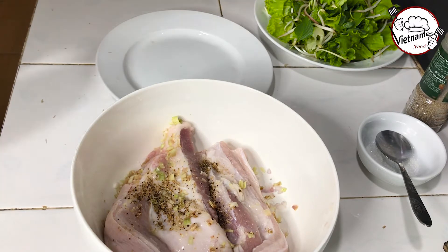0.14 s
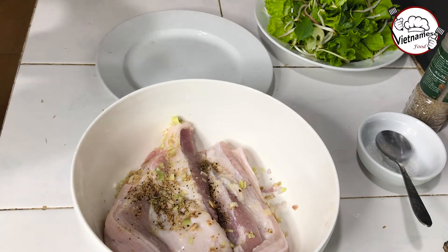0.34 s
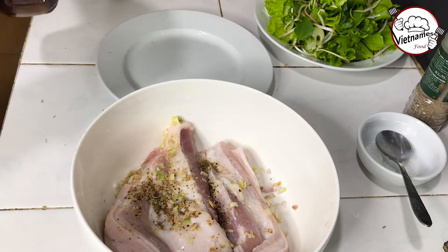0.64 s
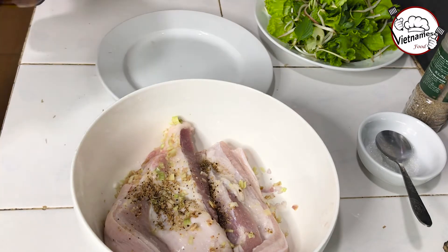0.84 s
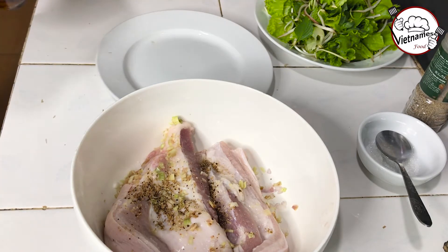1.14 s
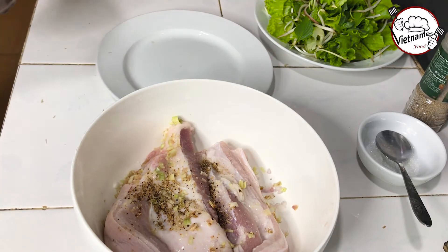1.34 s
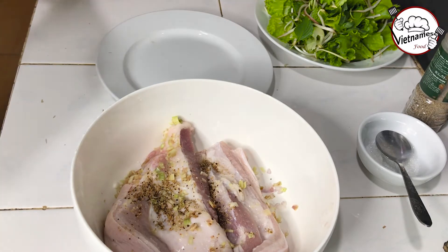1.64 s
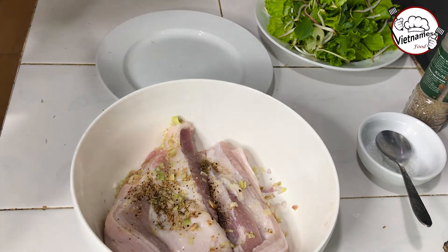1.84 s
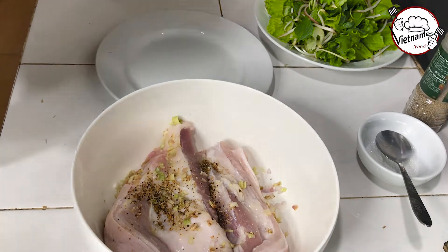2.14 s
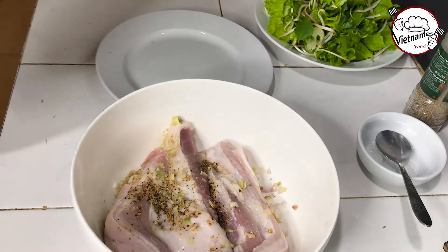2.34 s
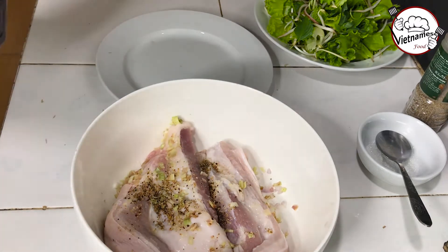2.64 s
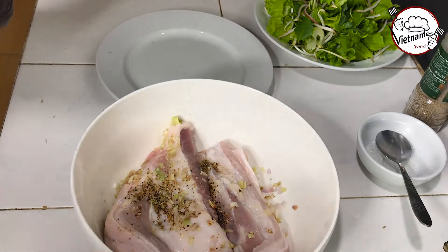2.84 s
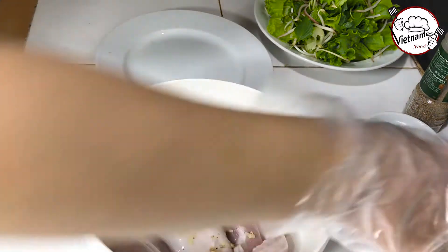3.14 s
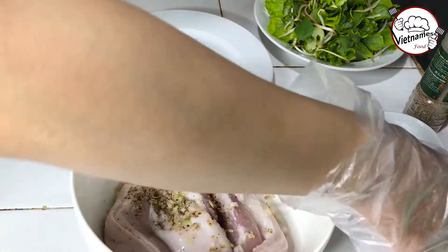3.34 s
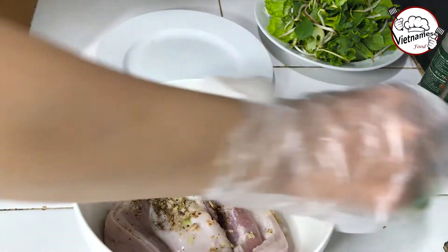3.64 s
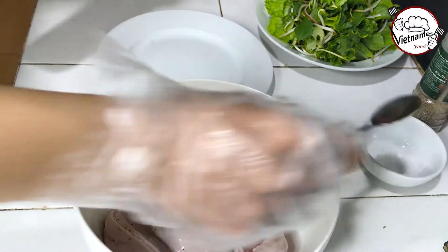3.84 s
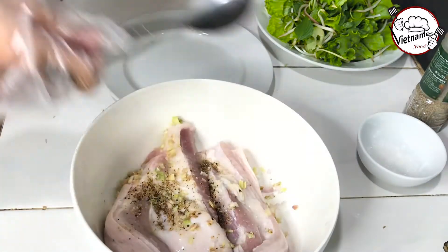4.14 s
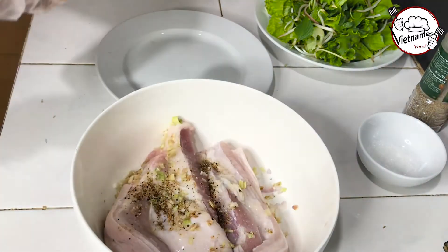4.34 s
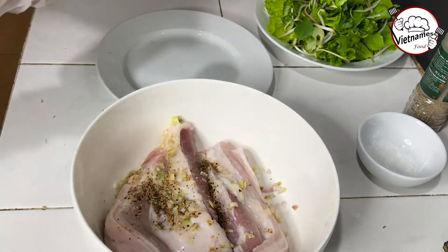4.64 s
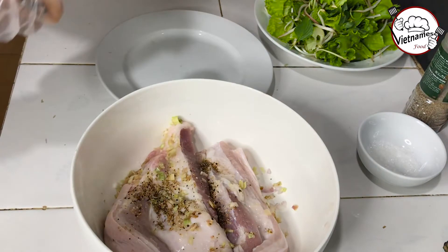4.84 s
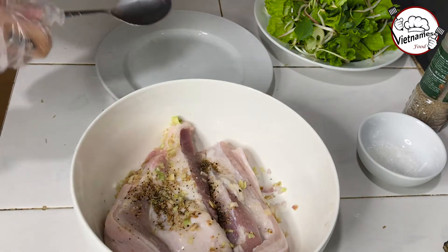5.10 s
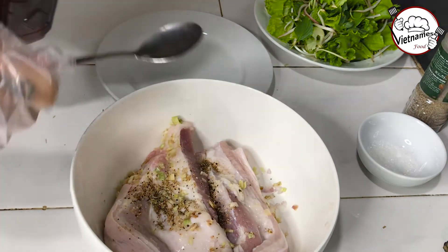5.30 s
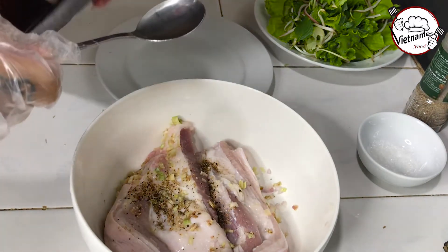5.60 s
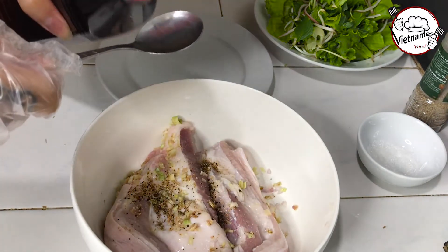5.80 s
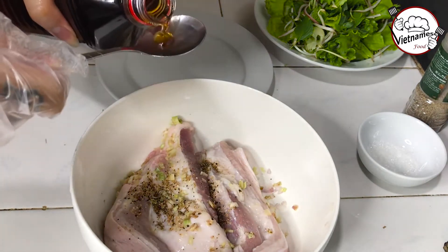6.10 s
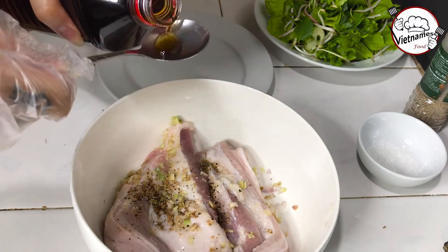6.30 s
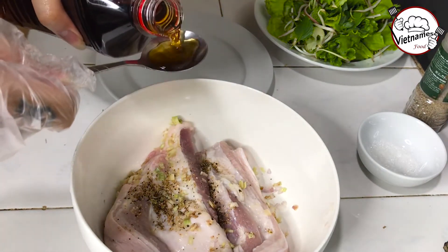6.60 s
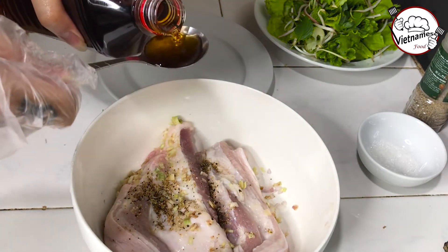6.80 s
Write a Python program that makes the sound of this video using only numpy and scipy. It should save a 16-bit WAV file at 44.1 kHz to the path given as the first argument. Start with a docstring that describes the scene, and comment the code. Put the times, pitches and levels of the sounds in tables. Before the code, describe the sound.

Thin plastic gloves rustle and crinkle close to the microphone over a tiled kitchen counter. A cap clicks open in two quick steps and a bottle knocks sharply on the tiles. A brief rush of noise swells as a spoon clinks and scrapes faintly on a small ceramic dish. The gloves crinkle again, louder for a moment, then sauce glugs quietly from the bottle over a faint low room rumble.

```python
"""Thin plastic gloves rustle and crinkle, close to a small microphone over a tiled kitchen counter:
the film buckles in countless tiny ticks and its sharper creases snap. Just as near, a cap clicks open,
a bottle knocks on the tiles, a spoon clinks and scrapes on a small dish, and sauce glugs as air enters
the bottle neck. Behind it all the kitchen rumbles and a far engine drones briefly.
A broad rush of noise starts abruptly at 2.45 s and dies away by 3.3 s."""
import sys
import numpy as np
from scipy import signal
from scipy.fft import rfft, irfft
from scipy.io import wavfile
from scipy.ndimage import uniform_filter1d

SR = 44100
rng = np.random.default_rng(int(sys.argv[2]) if len(sys.argv) > 2 else 0)


def to_wav(s):
    """Save 16-bit WAV."""
    ch = np.atleast_2d(s).T  # columns
    pcm = np.round(np.clip(ch, -1, 1) * 32767)  # PCM
    wavfile.write(sys.argv[1], SR, pcm.astype(np.int16))


N = 306933

# Centres of the five glove bands: f/Hz
GLOVE_BANDS = [1400, 2650, 4600, 7700, 12600]
# Offset of each band from the 6-10 kHz level: level/dB
GLOVE_BALANCE = [-18.5, -11, -5.5, -1.3, 0]
# Glove rustle, with a smooth, loud hiss from 2.45 to 3.25 s:
# t/s, level at 6-10 kHz/dB, extra body/dB per octave below, extra top/dB, patchiness/0-1
RUSTLE_AND_HISS = [(0, -69, 5, 15, 0.6), (.25, -71.5, 1, 3, 0.81), (.8, -60.5, -0.5, -6.5, 1),
                   (1.3, -68.5, 3.5, 4.5, 0.76), (2.2, -66, 3.5, -0.5, 0.71), (2.44, -45.5, -4, -9, 0.38),
                   (2.46, -44.5, 4, 1, 0.18), (3.24, -45, 3, 4, 0), (3.4, -71.5, -9, 7, 1),
                   (3.55, -53.5, -20, 7.5, 0.96), (3.95, -59, -0.5, 7, 1), (3.98, -70, 0, 6, 1),
                   (4.0, -61.5, -3, 11, 0.8), (4.07, -54.5, 0.5, 5, 0.93), (4.5, -51, 0, -1.5, 1),
                   (4.72, -61, 0.5, -1.5, 1), (4.88, -72.5, 3, 6.5, 1), (5.24, -71.5, 2.5, 9, 0.8),
                   (5.29, -50.5, 3, 2, 0.44), (5.48, -31.5, 0.5, 1.5, 0.41), (5.68, -46.5, -1.5, -4.5, .6),
                   (5.99, -60, 3.5, 0.5, 1), (6.08, -77.5, 3, 2, 0.95), (6.96, -93.5, 2, 1, 1)]
# Single crumples: t at full level/s, rise/s, hold/s, level at 6-10 kHz/dB,
# extra body/dB per octave below, extra top/dB, ring f/Hz, ring offset/dB
CRUMPLES = [(.055, .02, 0.022, -71, 0, 14, 13500, -4), (.15, .03, 0.046, -77, 6, 5, 13500, -2),
            (0.284, 0.025, .01, -46.5, 2, 2, 2117, -13), (0.363, .05, 0.031, -50.5, -2.5, -1, 5100, -10.5),
            (0.478, 0.046, .01, -63.5, -4, 3, 6470, -8), (0.581, 0.067, .02, -48, -1.5, -1.5, 3670, -8),
            (.68, 0.036, 0.011, -61.5, -1, -6, 3640, -7), (0.748, 0.023, .04, -58, 0, -2, 3700, -2.5),
            (0.831, 0.062, 0.038, -44.5, -2, -3.5, 3700, -10), (0.932, .04, 0.04, -52, -0.5, 2, 6700, -8),
            (0.984, .04, 0.022, -51, 0, -1, 9300, 0), (1.125, .02, 0.13, -57.5, -3, 2, 9300, 0),
            (1.44, .06, 0.023, -49.5, -1.5, 9.5, 1790, -16),
            (1.631, 0.058, 0.015, -43.5, -0.5, 3, 4970, -9.5),
            (1.913, 0.055, .05, -61, -0.5, 4, 4700, -5.5), (2.03, 0.043, 0.0076, -52, -1.5, -4, 4500, -5.5),
            (2.314, 0.073, 0.024, -43, -2, -2, 7800, -7.5), (2.401, .02, 0.026, -41, -3, -9, 2800, -14),
            (2.465, 0.03, 0.053, -36, 2.5, 1.5, 6200, -11.5), (2.577, .04, 0.024, -37, 2, -2.5, 7000, -12),
            (2.757, .04, 0.072, -48.5, 4.5, 7, 7000, -11), (3.087, .02, 0.032, -41.5, 3, 2.5, 12500, -8),
            (3.175, 0.034, 0.055, -35.5, 0.5, 2, 9600, -15), (3.304, .03, 0.03, -49, -2.5, 0, 5400, -10),
            (3.545, 0.026, 0.056, -47, 1, 0, 2490, -5), (3.615, 0.018, 0.022, -53.5, -0.5, -3, 1000, -16),
            (3.769, .01, 0.011, -43.5, 1.5, 2, 4430, -7), (3.84, 0.033, 0.045, -56, 1.5, 5, 8600, -2),
            (4.082, .02, 0.055, -58.5, -2, 2, 2600, -4.5), (4.174, .01, 0.016, -46, -0.5, -1, 4500, -6.5),
            (4.346, .02, 0.09, -46.5, -1.5, 1, 2600, -12.5), (4.44, .04, 0.038, -45.5, 0, -1, 2595, -12.5),
            (4.667, .03, 0.039, -51, 4, 2, 2580, -5), (4.965, 0.055, 0.008, -53, -2.5, -4.5, 4590, -7.5),
            (5.067, .01, 0.024, -56.5, 2.5, 2.5, 9400, -3), (5.275, .02, .03, -56, -2, 1, 2500, -4.5),
            (5.366, .04, 0.034, -39.5, -7, 3, 6500, -9), (5.65, .02, .01, -46, -7, 2, 2880, -11),
            (5.814, .03, 0.022, -52, 1, 0, 2480, -11), (6.116, 0.011, .02, -70, 1.5, 8.5, 3740, -1.5),
            (6.232, .02, 0.044, -78.5, 1.5, 0.5, 13000, 1), (6.449, .03, 0.015, -75, 0.5, -0.5, 3490, -5),
            (6.587, 0.043, .02, -80, 2.5, 5, 11450, -2), (6.666, .01, .01, -79, -2, 7, 11300, 0),
            (6.917, .04, 0.016, -70, -6.5, 7.5, 4400, -5)]
def band_levels():
    """Close glove rustle, the spell of smooth hiss and the crumples, summed as dB per Hz in each band."""
    t = np.arange(0, N, 64) / SR
    octaves_below = np.maximum(np.log2(GLOVE_BANDS[3] / np.array(GLOVE_BANDS)), 0)[:, None]
    is_top = (np.arange(5) == 4)[:, None]
    widths_hz = np.array([1000, 1500, 2500, 4000, 5800])
    db, body, top_db, _ = curves(RUSTLE_AND_HISS)[:, ::64]
    power = undb(2 * (db + body * octaves_below + top_db * is_top))
    for s, rise, hold, db, body, top_db, _, _ in CRUMPLES:
        power += undb(2 * (db + crumple_db(t, s, rise, hold) + body * octaves_below + top_db * is_top))
    density = 10 * np.log10(power / widths_hz[:, None]) + np.array(GLOVE_BALANCE)[:, None]
    return np.array([np.interp(np.arange(N) / SR, t, row) for row in density])


def crumple_db(t, s, rise, hold, rise_db=25.5, release_db_per_s=350):
    """One crumple rises, holds and dies away, in dB relative to its full level."""
    return -rise_db * np.maximum(s - t, 0) / rise - release_db_per_s * np.maximum(t - s - hold, 0)


def patch_rings(film):
    """Each crumpled patch of film rings in a narrow band of its own."""
    out = np.zeros(N)
    for s, rise, hold, db, _, _, hz, ring_db in CRUMPLES:
        i = np.arange(max(int((s - .15) * SR), 0), min(int((s + .35) * SR), N))
        envelope = undb(db + ring_db + crumple_db(i / SR, s, rise, hold))
        out[i] += envelope * unit(band(film[i], hz, 0.065 * hz))
    return out


# Bands the stretched film favours with hands empty, on the spoon, on the bottle:
# from t/s, [(f/Hz, width/Hz, level/dB)]
GRIPS = [(0, [(2010, 50, -2), (3550, 68, -3.5), (4900, 150, -6), (6460, 240, 1), (8480, 170, -12),
         (9200, 400, 3), (10570, 290, -0.5), (12100, 250, -7.5), (13300, 490, 5.5), (14800, 76, -18.5)]),
         (2.45, [(2600, 46, -5.5), (4510, 290, -0.5), (5280, 270, -9.5), (6350, 160, -4), (8500, 330, 1.5),
         (9850, 240, -9.5), (10940, 220, -3.5), (11300, 51, -16.5), (13000, 230, -10), (14600, 150, 6),
         (15270, 200, 1)]), (5.2, [(2830, 80, -4), (3550, 80, -3.5), (4500, 240, -1), (5700, 260, -3),
         (6470, 240, 2.5), (8800, 130, -2), (9400, 360, -13), (12200, 82, -7.5), (14000, 200, -2),
         (14700, 340, 2)])]
# How much of the rustle breaks into separate crinkles: t/s, share/0-1
SEPARATION = [(0, 0.47), (2.4, 0.4), (3.3, 0.57), (4.7, 0.47), (5.3, .4), (5.62, 0.3), (5.8, 0.88),
              (6.96, 1)]
def glove_rustle_and_hiss(density, swish=0.84, patchy_db=9.5, flicker_db=1.94, grip_depth=0.69):
    """Close up, tiny buckles ride on a smooth swish; patches of film come and go in narrow bands."""
    patchiness = curves(RUSTLE_AND_HISS)[-1]
    apart = curves(SEPARATION)[0]
    dense = unit(swish + grains(per_s=880, spread_db=3.5, most_db=23, grain_s=0.00062))
    sparse = unit(0.6 + grains(per_s=110, spread_db=12, most_db=6.6, grain_s=0.0029))
    film = (np.sqrt(1 - apart) * dense + np.sqrt(apart) * sparse) / 1.475 * rng.standard_normal(N)
    grip = np.searchsorted([s for s, _ in GRIPS[1:]], np.arange(N) / SR)
    flicker = flicker_db * walk(40)
    out = np.zeros(N)
    for hz in np.arange(1000, 16000, 340):
        place = np.interp(np.log(hz), np.log(GLOVE_BANDS), np.arange(5))
        k = min(int(place), 3)
        db = density[k] + (place - k) * (density[k + 1] - density[k])
        db -= 8 * max(np.log2(GLOVE_BANDS[0] / hz), 0)  # 8 dB per octave under the lowest band
        peak_db = [max(top - 6 * ((hz - f) / max(width, 300)) ** 2 for f, width, top in peaks)
                   for _, peaks in GRIPS]
        grip_db = np.maximum(peak_db, -12) + 8
        patch_db = grip_depth * grip_db[grip] + patchy_db * np.tanh(1.5 * walk(7))
        out += undb(db + patchiness * patch_db + flicker) * band(film, hz, 226.7)
    return out * np.sqrt(SR / 2) * undb(-1.5) + patch_rings(film)


# The clearest creases snapping at the microphone: t/s, peak level/dB, f/Hz
CREASES = [(0.2747, -31, 12800), (0.5816, -40, 9610), (1.0826, -34, 3770), (1.178, -39, 10500),
           (1.4351, -34, 9600), (1.633, -31, 7950), (2.2144, -49, 12200), (2.2419, -44.5, 4460),
           (2.3201, -27.5, 7940), (2.3476, -30, 7480), (2.397, -31, 7760), (2.7985, -30, 11700),
           (2.8241, -26.5, 7120), (2.8977, -30, 9000), (2.9523, -27.5, 7420), (3.052, -37, 7190),
           (3.0906, -24, 12800), (3.162, -31, 12400), (3.2005, -27, 12800), (3.7184, -32, 9600),
           (3.7728, -32.5, 4370), (3.9921, -33, 12000), (4.0526, -41, 8500), (4.1714, -29, 10700),
           (4.217, -33, 11200), (4.4613, -25.5, 5350), (5.0707, -28.5, 9600), (5.103, -34.5, 10100),
           (5.2382, -42.5, 12000), (5.2703, -37, 8600), (5.338, -33.5, 11400), (5.3598, -30.5, 6500),
           (5.4642, -24, 11200), (5.5142, -27.5, 11800), (5.657, -34, 5900), (5.8197, -35, 8900),
           (6.126, -50, 12600), (6.2133, -45, 7240), (6.2377, -49, 13000), (6.4182, -49.5, 12040),
           (6.6333, -46, 8970), (6.7685, -49.5, 4760), (6.917, -54.5, 4410)]
def crease_snaps(density, small_count=60, spread_db=2.5, edge_db=-10.5):
    """A crease gives a tick that rings for a few cycles, with a bright edge; small ones come at random."""
    out = np.zeros(N)
    when, size, pitch = rng.random((small_count, 3)).T
    local_db = density[3, (when * N).astype(int)] + 10 * np.log10(4000)  # level at 6-10 kHz
    small_db = local_db + 2 - spread_db * np.log(1 - size)
    small = zip(when * N / SR, small_db, 4000 * 3 ** pitch)
    for s, db, hz in [*CREASES, *small]:
        tick = crack(0.013)[:2048]
        body = band(tick, hz, 0.37 * hz)
        edge = band(tick, 12500, 6000)
        add(out, s, undb(db) * (body / np.abs(body).max() + undb(edge_db) * edge / np.abs(edge).max()))
    return out


# The cap giving way, close by: t/s, level/dB, ring offset/dB, crack offset/dB, rattle offset/dB
CAP_CLICKS = [(1.736, -12.5, -2.5, -26, -33), (1.815, -21.5, 11, -33, -1)]
# Modes of the cap: f/Hz, level/dB, t60/s
CAP_MODES = [(1196, 1.5, .04), (2550, -12, 0.023), (4730, -1, 0.033), (5480, 9.5, 0.0058),
             (6900, -23, 0.011), (10400, 8, 0.0045), (13500, -2, 0.017)]
def cap_clicks():
    """The cap clicks open in two quick, bright steps."""
    return impacts(CAP_CLICKS, CAP_MODES)


# Bottle meeting counter: t/s, level/dB, ring offset/dB, crack offset/dB, rattle offset/dB
BOTTLE_KNOCKS = [(1.98, -42.5, 12.5, -1.1, -16), (2.094, -4, -5.5, -0.6, -19),
                 (2.105, -4.5, -2.5, -0.61, -25)]
# Modes of the bottle: f/Hz, level/dB, t60/s
BOTTLE_MODES = [(1050, -3, 0.037), (1572, -12, .08), (1684, -5.5, 0.18), (1762, 5, 0.065), (3220, -19, .03),
                (3700, -7, 0.015), (6350, -4.5, 0.0099), (7700, -9, 0.0046), (10200, -14, .01)]
def bottle_knocks():
    """The bottle knocks on the tiles near the microphone and rings briefly."""
    return impacts(BOTTLE_KNOCKS, BOTTLE_MODES)


def impacts(hits, modes, rattle_t60_s=0.13):
    """Each hard contact gives a ring, a crack and a short rattle, with the lows rolled off."""
    out = np.zeros(N)
    for s, db, ring_db, crack_db, rattle_db in hits:
        add(out, s, undb(db + ring_db) * ring(modes, length_s=.4))
        add(out, s, undb(db + crack_db) * band(crack(0.0038), 3900, 9500))
        add(out, s, undb(db + rattle_db) * band(crack(rattle_t60_s), 4500, 9400))
    return band(out, 9390, 13530)


# Spoon striking the dish on the counter: t/s, peak level/dB
SPOON_CLINKS = [(2.596, -11), (2.6042, -21.5)]
# The dish's tight cluster of modes: f/Hz, level/dB, t60/s
DISH_MODES = [(3000, -21, .05), (3245, -39, .06), (3488, -15.5, 0.065), (3760, -5, .07), (3830, -11, .05),
              (3870, -3.5, .08), (4054, 9.5, .08), (3630, -2.5, 0.15), (4083, 11, 0.12), (4164, 6.5, .2),
              (4320, 0, .12), (4500, -15.5, .12), (4410, -10, .09), (4619, -10, 0.068)]
def spoon_on_dish(shiver_db=-42.5, hold_s=0.073, fall_db_per_s=107, scrape_db=-54, scrape_s=(3.28, 3.8)):
    """Steel on ceramic, close by: the spoon clinks, shivers, then scrapes round the dish."""
    out = np.zeros(N)
    for s, db in SPOON_CLINKS:
        add(out, s, undb(db) * ring(DISH_MODES, length_s=.6))
        add(out, s, undb(db - 18.5) * band(crack(.004), 4000, 6500))
    friction = (0.32 + grains(per_s=300, spread_db=3, most_db=14, grain_s=.003)) * rng.standard_normal(N)
    dish_colour = ring(DISH_MODES, length_s=.0015, scatter_db=0.906, rough=0)
    rubbing = unit(signal.fftconvolve(friction, dish_colour)[:N])
    t = np.arange(N) / SR
    since = t - SPOON_CLINKS[0][0]
    shiver = (since > 0) * undb(shiver_db - fall_db_per_s * np.maximum(since - hold_s, 0))
    inside_s = np.minimum(t - scrape_s[0], scrape_s[1] - t)
    scrape = undb(scrape_db) * np.clip(inside_s / .07 + 1, 0, 1) ** 2  # 70 ms fades
    return out + (shiver + scrape) * rubbing


def bottle_squeeze(at_s=5.475, db=-46.5):
    """The hand closes round the bottle with a dull bump that dies slower than it came."""
    t = np.arange(N) / SR - at_s
    swell = np.exp(np.where(t < 0, t / 0.0078, -t / 0.016))
    dull_noise = unit(band(band(rng.standard_normal(N), 1040, 1080), 1100, 1150))
    return undb(db) * swell * dull_noise


# Air entering the bottle neck, near but quiet: t/s, base level/dB, f/Hz, t60/s
BUBBLES = [(6.164, -39.5, 729, 0.043), (6.416, -51, 719, 0.044), (6.953, -57.5, 791, 0.042)]
def sauce_glugs():
    """A bubble's skin ticks, it swells and rings with weak overtones; smaller ones murmur in the neck."""
    out, t = np.zeros(N), np.arange(8192) / SR
    for s, db, hz, t60 in BUBBLES:
        phase = 2 * np.pi * hz * t * (1 - 0.35 * t)
        tone = np.sin(phase) + undb(-17) * np.sin(1.496 * phase) + undb(-19) * np.sin(2 * phase)
        envelope = np.minimum(t / 0.0031, 1) ** 2 * undb(-60 * t / t60)
        murmur = band(band(crack(0.16), hz, 280), hz, 293)
        tick = band(band(crack(0.039), 3800, 3400), 3860, 2740)
        add(out, s, undb(db + 6) * tone * envelope + undb(db + 13) * murmur + undb(db + 1) * tick)
    return out


def tile_reflections(near, t60_s=0.099, db=-11):
    """Tiles and walls answer with a short decaying tail, starting 4 ms after the direct sound."""
    t = np.arange(SR // 2) / SR
    tail = rng.standard_normal(len(t)) * undb(-60 * t / t60_s) * (t > .004)
    return undb(db) * signal.fftconvolve(near, tail / np.sqrt(np.sum(tail ** 2)))[:N]


# Background noise; a broad rush starts abruptly at 2.45 s and dies away by 3.3 s:
# t/s, rumble level/dB, wash base level/dB, deep band level/dB
BACKGROUND_LEVELS = [(0, -65.5, -81.5, -86), (1.38, -68.5, -78.5, -80), (1.94, -67, -75.5, -83),
                     (2.44, -67.5, -82, -84), (2.455, -51, -51, -65), (2.64, -55, -59, -67),
                     (3.18, -58.5, -58.5, -62), (3.31, -75, -85.5, -67.5), (4.41, -68, -76, -69),
                     (4.93, -71, -83, -69.5), (6.96, -72, -87, -65)]
# Spectrum of the rumble: f/Hz, relative level/dB
RUMBLE_SPECTRUM = [(41, -38), (70, 2), (118, 5), (169, -2), (242, -16.5), (290, -10), (321, -27),
                   (400, -17.5), (520, -52.5), (880, -120)]
# Wavering tones in the rumble: f/Hz, width/Hz, level against the rumble/dB
HUM_TONES = [(125.1, 12, -7), (189, 18, -15.5), (223, 3, -17.5), (289, 2, -18.5)]
# Spectrum of the wash: f/Hz, relative level/dB
WASH_SPECTRUM = [(120, -40.5), (200, -2.5), (221, -1.5), (373, -1), (457, -8), (548, -3.5), (744, -3.5),
                 (3000, -12.5), (3900, -34), (6600, -120)]
def background_and_rush(hiss_db=-92):
    """Kitchen rumble and hum, deep traffic, a wash and faint hiss; a broad rush of noise breaks in once."""
    rumble_db, wash_db, deep_db = curves(BACKGROUND_LEVELS)
    rumble = coloured(RUMBLE_SPECTRUM)
    hum = sum(undb(db) * unit(band(rng.standard_normal(N), hz, width)) for hz, width, db in HUM_TONES)
    deep = undb(deep_db) * unit(band(band(rng.standard_normal(N), 58, 30), 58, 30))
    hiss = undb(hiss_db) * unit(band(rng.standard_normal(N), 10000, 13000))
    rumble_gain = undb(rumble_db + 2.5 * walk(12))
    wash = undb(wash_db + 1.5) * coloured(WASH_SPECTRUM)
    return rumble_gain * (rumble + hum) + wash + deep + hiss


# An engine far from the kitchen: t/s, firing f/Hz, level/dB
ENGINE_RUN = [(1.3, 25.6, -91), (1.7, 27.22, -73.5), (2.0, 28, -69.5), (2.43, 28.2, -71), (2.47, 28.3, -96)]
# Its harmonics: multiple of the firing rate, relative level/dB
ENGINE_HARMONICS = [(4, -.1), (5, -1.5), (6, -.2), (7, -5)]
def far_engine():
    """A distant engine speeds up a little; a few low, unsteady harmonics reach the microphone."""
    hz, db = curves(ENGINE_RUN)
    phase = 2 * np.pi * np.cumsum(hz) / SR
    drone = sum(undb(level + 1.5 * walk(6)) * np.sin(k * phase + 6 * rng.random())
                for k, level in ENGINE_HARMONICS)
    return undb(db) * np.sqrt(2) * drone


def grains(per_s, spread_db, most_db, grain_s):
    """Envelope of tiny random buckles or catches, each rising fast and dying away; rms 1."""
    onsets = rng.random(N) < per_s / SR
    sizes = undb(np.minimum(spread_db * rng.exponential(size=N), most_db))
    age = np.arange(1024) / SR / grain_s
    return unit(signal.fftconvolve(onsets * sizes, (1 - np.exp(-6 * age)) * np.exp(-age))[:N])


def ring(modes, length_s, scatter_db=1.0, rough=.35):
    """Decaying modes of a struck thing, unevenly excited and wavering as it rattles; peak 1."""
    t = np.arange(int(length_s * SR)) / SR
    hz, db, t60 = np.transpose(modes)[:, :, None]
    gain = undb(db + scatter_db * rng.standard_normal(hz.shape))
    waver = 1 + rough * unit(uniform_filter1d(rng.standard_normal((len(hz), len(t))), size=200))
    out = (gain * waver * np.sin(2 * np.pi * hz * t) * undb(-60 * t / t60)).sum(axis=0)
    return out / np.abs(out).max()


def crack(t60_s):
    """Short broadband burst with a 0.4 ms attack."""
    t = np.arange(8192) / SR
    return rng.uniform(-1, 1, len(t)) * np.minimum(t / .0004, 1) * undb(-60 * t / t60_s)


def coloured(spectrum):
    """Steady noise of a given spectrum, rms 1."""
    hz, db = np.transpose(spectrum)
    f = np.arange(N // 2 + 1) * SR / N + 1
    gain = undb(np.interp(np.log(f), np.log(hz), db, right=-90))
    return unit(irfft(rfft(rng.standard_normal(N)) * gain, N))


def walk(per_s):
    """Random levels, each held and slewed into the next; spread near 1."""
    hold = int(SR / per_s)
    levels = rng.standard_normal(N // 100)[:N // hold + 1]
    return uniform_filter1d(np.repeat(levels, hold), hold // 2)[:N]


def band(x, hz, width_hz):
    """Band-pass centred on hz."""
    edges = np.clip([hz - width_hz / 2, hz + width_hz / 2], 10, SR / 2 - 100)
    return signal.sosfilt(signal.butter(2, edges, "band", fs=SR, output="sos"), x)


def curves(table):
    """Columns of a table joined by straight lines in time."""
    s, *columns = np.transpose(table)
    return np.array([np.interp(np.arange(N) / SR, s, c) for c in columns])


def add(out, s, sound):
    i = int(s * SR)
    out[i:i + len(sound)] += sound[:N - i]


def undb(db):
    return 10 ** (np.asarray(db) / 20)


def unit(x):
    return x / np.sqrt(np.mean(x ** 2))


def scene():
    """Mono, over the counter: close sounds, their reflections, then the background and the far engine."""
    density = band_levels()
    near = crease_snaps(density) + cap_clicks() + bottle_knocks() + spoon_on_dish() + sauce_glugs()
    foreground = near + tile_reflections(near) + glove_rustle_and_hiss(density) + bottle_squeeze()
    return (foreground + background_and_rush() + far_engine())[None]


def record(dry):
    """The small microphone cuts the top above about 16 kHz."""
    return signal.sosfilt(signal.ellip(10, .2, 70, 15950, fs=SR, output="sos"), dry)


dry = scene()
out = record(dry)
to_wav(out)
```